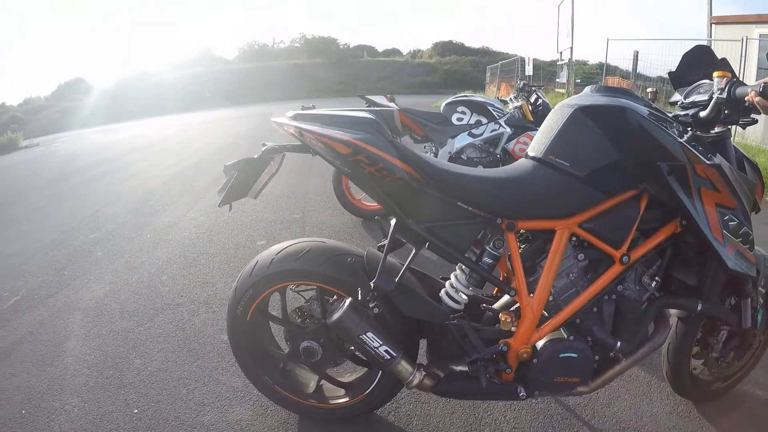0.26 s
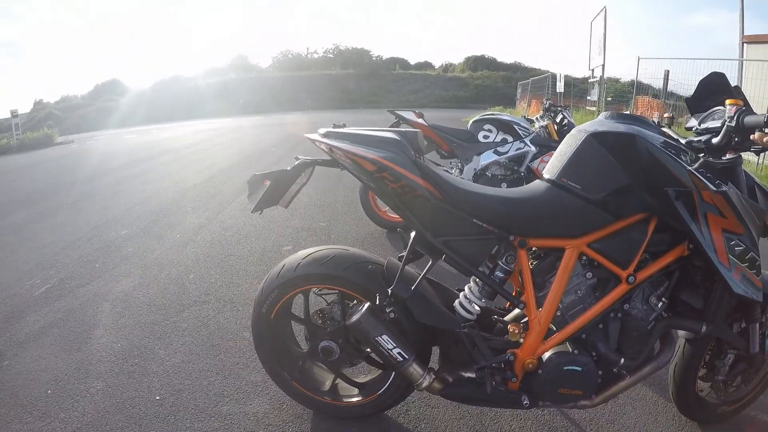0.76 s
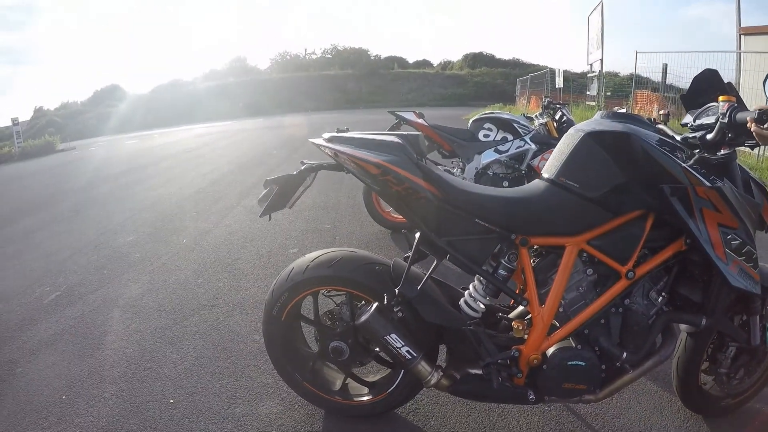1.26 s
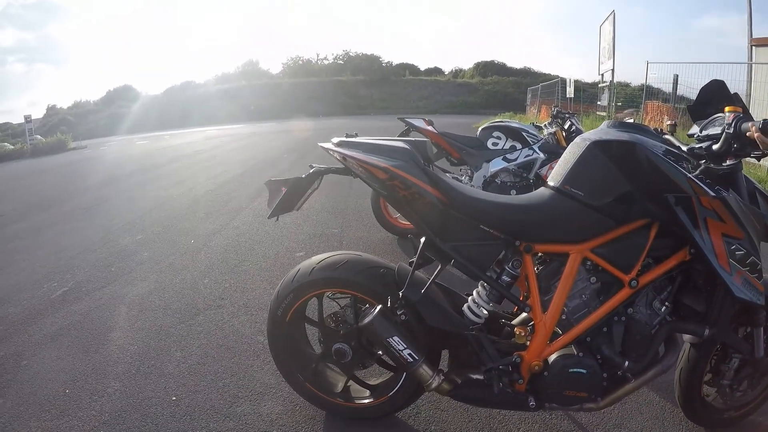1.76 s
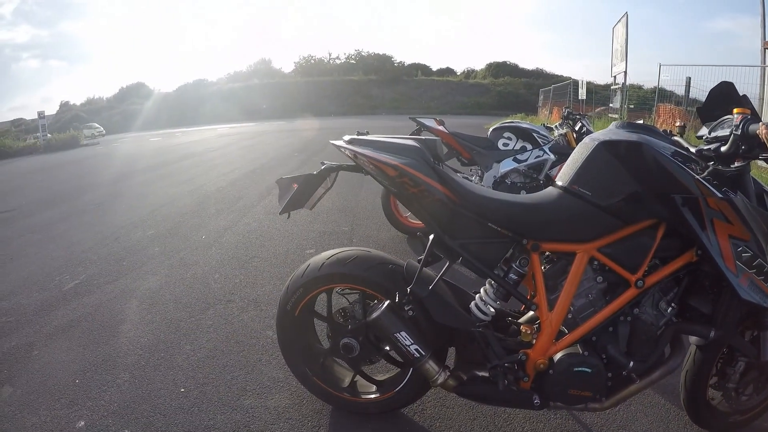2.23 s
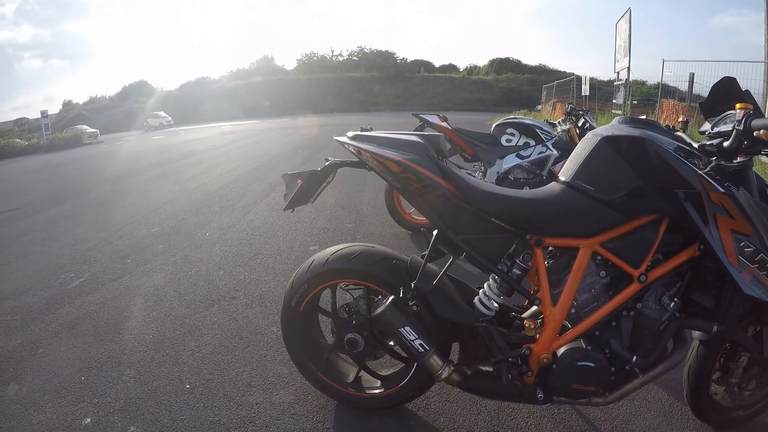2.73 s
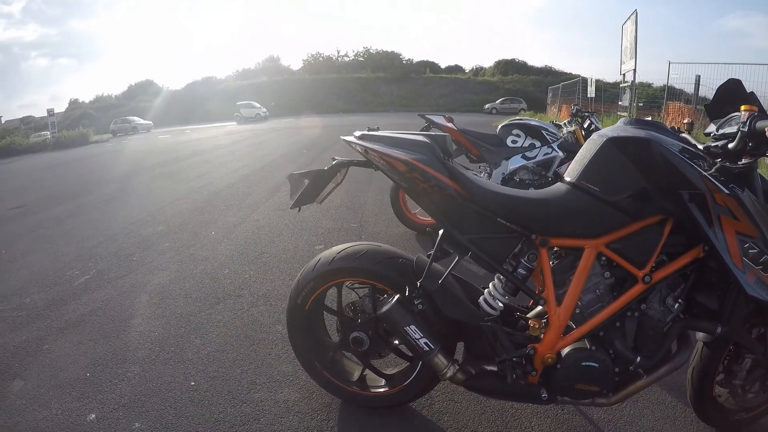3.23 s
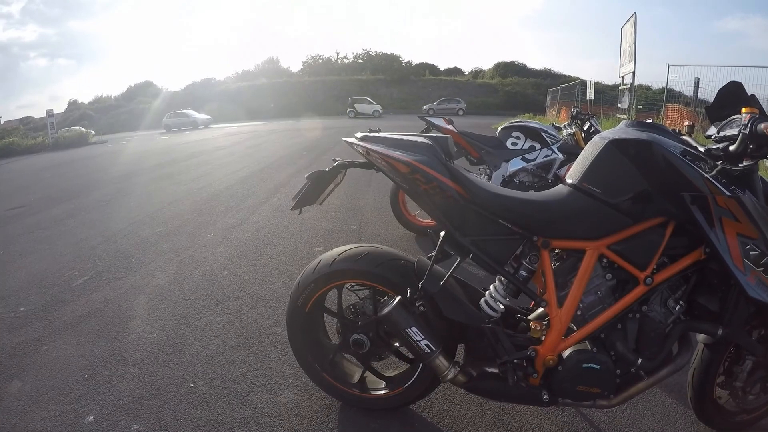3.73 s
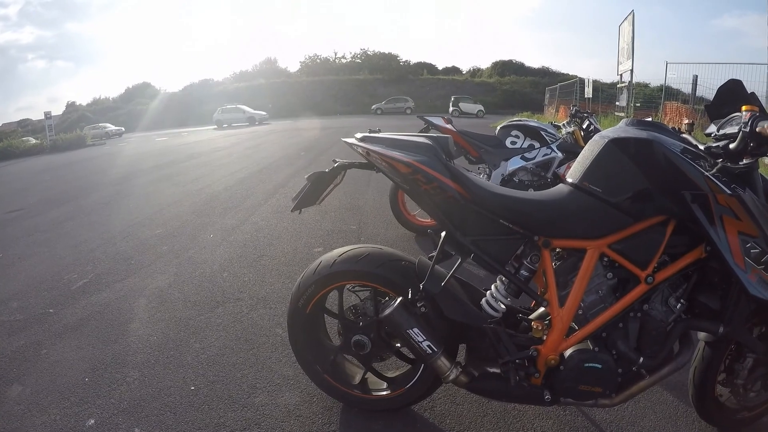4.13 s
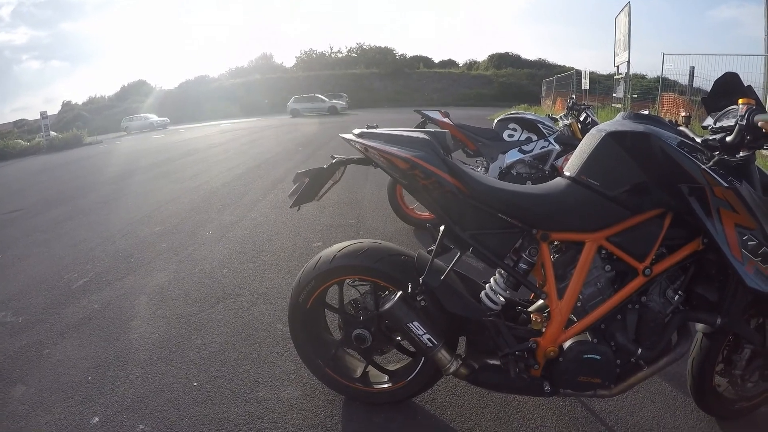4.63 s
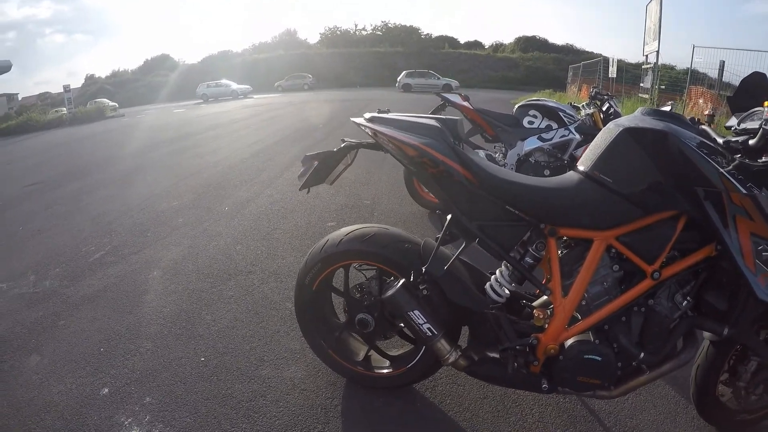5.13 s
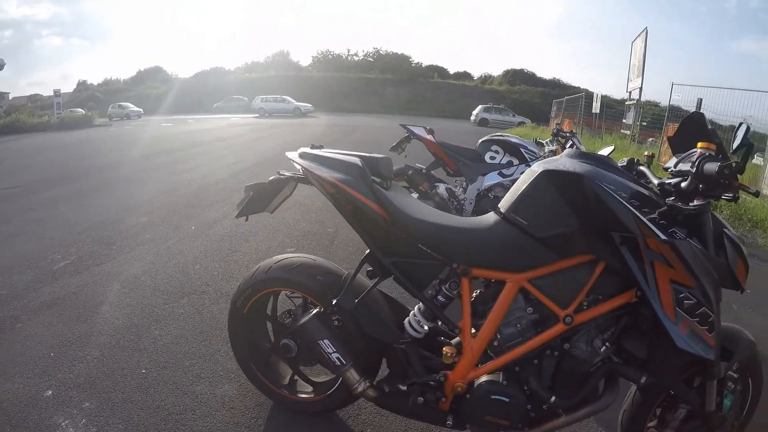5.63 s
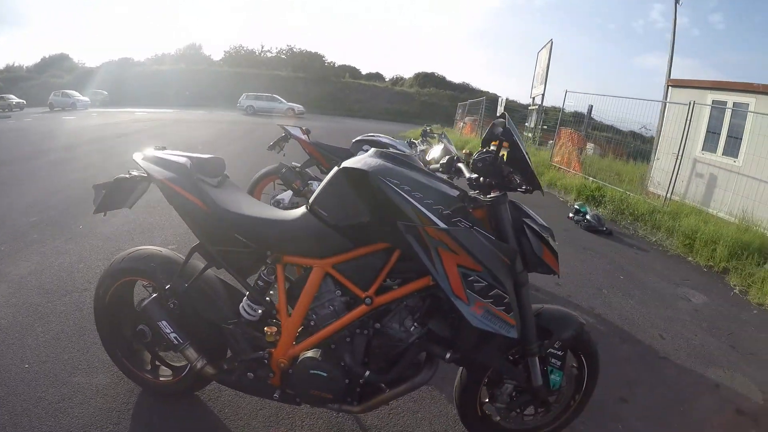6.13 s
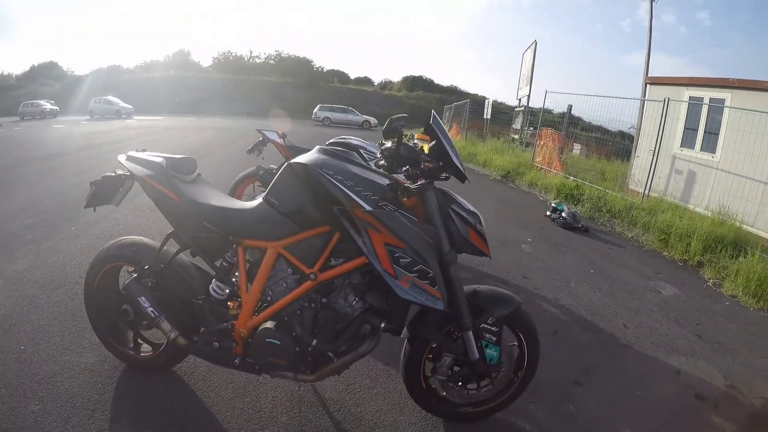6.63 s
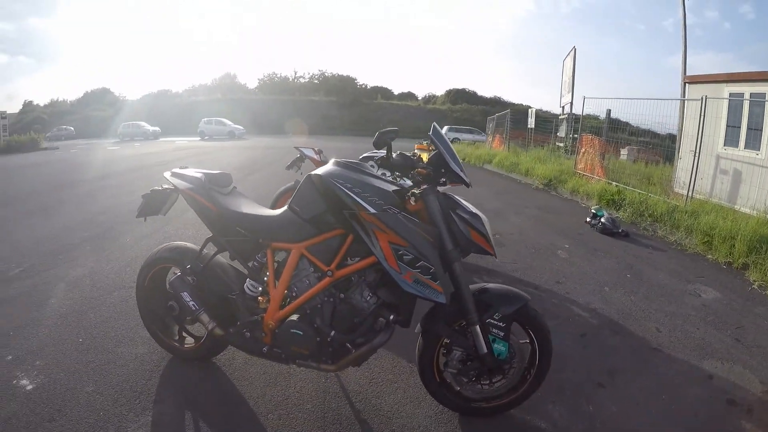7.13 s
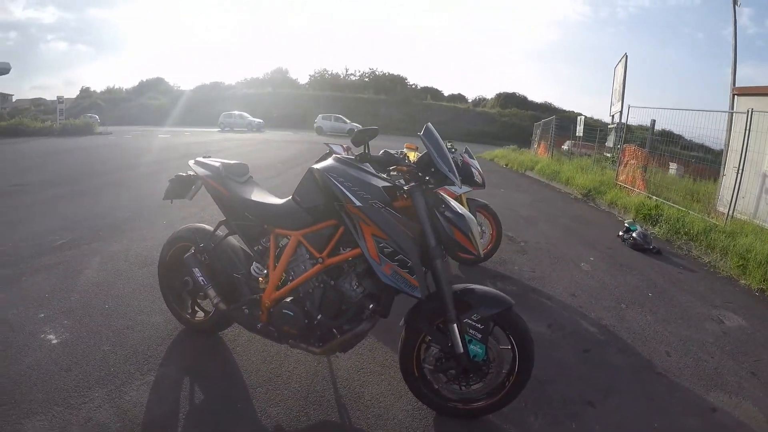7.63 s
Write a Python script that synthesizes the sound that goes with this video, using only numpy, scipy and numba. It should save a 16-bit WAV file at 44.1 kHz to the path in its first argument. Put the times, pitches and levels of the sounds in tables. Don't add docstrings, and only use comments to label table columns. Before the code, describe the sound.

A big twin-cylinder motorcycle idles with a lumpy thump, is revved in five sharp throttle blips, then settles to idle as the microphone gets bumped.

```python
import sys
import numpy as np
from scipy import signal
from scipy.fft import rfft, irfft
from scipy.io import wavfile
from scipy.ndimage import uniform_filter1d
from numba import njit

SR = 44100
rng = np.random.default_rng(int(sys.argv[2]) if len(sys.argv) > 2 else 0)


def volts(x):
    e = np.asarray(x, float) / 20
    return 10 ** e


def file_out(sig):
    cols = np.atleast_2d(sig).T
    lim = np.clip(cols, -1, 1)
    pcm = np.round(lim * 32767).astype(np.int16)
    wavfile.write(sys.argv[1], SR, pcm)


N = 347067

# start_s, thud_db, thud_hz, tick_db, tick_hz
HAND_BUMPS = [
    (6.312, -10.5, 40, -33, 900),
    (6.405, -13, 36.2, -42, 900),
    (6.616, -7.5, 25.8, -18.5, 800),
    (6.69, -23, 41, -27, 900),
    (6.78, -2.5, 43.5, -12.5, 1040),
    (7.121, -26, 59, -33, 1200),
    (7.431, -26, 65, -3.5, 2210),
]
# start_s, pitch_hz, level_db, t60_s
HOUSING_CREAK = (7.121, 1168, -25, .07)
# squeak_s, squeak_hz, squeak_db, squeak_length_s, rub_s, rub_hz, rub_db, rub_length_s
FINGER_SCUFF = (7.112, 2550, -29, .012, 7.13, 1250, -43, .07)

# centre_hz, width_hz, level_db
SILENCER_MODES = [(840, 36, -31), (1302, 145, -11.5), (1775, 134, 0.5), (1900, 100, 2), (2090, 113, 0)]
CASING_SIDE_MODES = [(2630, 184, 6.5), (3260, 450, -5.5), (3725, 42, 4.5), (4644, 80, 1.5),
                     (5610, 120, 0.5), (6880, 740, -10.5), (7900, 360, -35)]
CASING_FRONT_MODES = [(2630, 115, 4.5), (3400, 49, 3), (3700, 41, -14), (4730, 70, -11), (5600, 94, -7),
                      (6840, 160, -9), (8060, 210, -29)]
VALVE_COVER_MODES = [(3670, 190, 7.5), (4610, 280, 7), (2000, 230, -6), (7100, 770, -14), (9700, 250, -37)]
AIRBOX_MODES = [(57, 20, 4), (115, 50, -1)]
PIPE_IDLE_MODES = [(59, 16, 4.5), (90, 26, -4), (117, 22, 4)]
PIPE_OPEN_MODES = [(54, 65, 3), (119, 37, 5), (191.9, 62, -10), (310, 68, -2)]
PIPE_SHUT_MODES = [(52.2, 12, 9), (103.7, 40, 5), (119.3, 21.6, 1), (189, 51, -5.5), (302, 56, 9.5)]
PIPE_GROWL_MODES = [(356.4, 63, 4.5), (383, 44, -9), (433, 15.7, 3)]
# frequency_hz, level_db
RATTLE_SPECTRUM = [(280, -38), (480, -47), (740, -16.5), (1180, -4), (1400, -33), (1870, -12), (2350, -16),
                   (2640, -3), (3000, -0.5), (4700, -1), (5200, -3.5), (6940, -13), (15100, -40.5)]

# start_s, end_s
WALK_S = (6.4, 6.84)
# time_s, share_0_to_1
CAMERA_AWAY = [
    (.01, 0.38),
    (4.6, 0.34),
    (5.6, 0.38),
    (6.3, 0.6),
    (6.8, 0.77),
    (7.2, 1),
    (7.87, .99),
]

START_CYCLE = -.041
FIRE_CYCLE = (0, .604)
VALVE_CYCLE = (.2, .575)
BACKFLOW_CYCLE = (.2, .768)
# time_s, speed_cycles_per_s
IDLE_SPEED = [
    (0, 12.434),
    (.7, 10.997),
    (2.5, 12.725),
    (5, 12.193),
    (5.6, 11.724),
    (5.72, 12.984),
    (5.9, 11.664),
    (7.87, 11.696),
]
# open_s, spin_up_s, top_cycles_per_s, run_down_tau_s
THROTTLE_BLIPS = [
    (.6633, .1578, 34.55, .5289),
    (1.3526, .2077, 54.38, .4911),
    (2.5394, .1868, 37.46, .5279),
    (3.2326, .1603, 45.94, .4825),
    (3.8935, .1467, 44.54, .5216),
]
# hold_s, strength_0_to_1
GAS_AFTERFLOW = [
    (0.33, 0.44),
    (0.46, .99),
    (0.28, 0.55),
    (0.33, 0.8),
    (0.32, 0.78),
]
COAST_HZ = 6.169
OPENS_SHARE, SHUTS_SHARE = 0.075, 0.57
OPEN_S, SHUT_S, EBB_S = 0.035, 0.069, .08
# none_below_hz, full_above_hz of overrun
OVERRUN_HZ = (12.1, 17.4)

# idle_db, speed_db_per_octave, full_throttle_db, overrun_db, front_view_db, afterflow_db
THUMP_LEVEL = (-22, 4.5, 4, 0, -6, 3.5)
GROWL_LEVEL = (-17.5, 4.5, 6, -3, -8, 2)
HISS_LEVEL = (-31.5, 5.5, 6, -1.67, -8.5, 2.5)
CLATTER_LEVEL = (-35, 6, 5, -0.28, -0.6, 2.5)
CHOKE_HZ, CHOKE_DB_PER_OCTAVE = 32.4, -6


def unit(x):
    return x / np.sqrt(np.mean(x ** 2))


def even(x):
    return x / np.sqrt(uniform_filter1d(x ** 2, size=7000) + 1e-12)


def dull(x, top_hz):
    return signal.sosfilt(signal.butter(4, top_hz, fs=SR, output="sos"), x)


def thin(x, low_hz):
    return signal.sosfilt(signal.butter(2, low_hz, "high", fs=SR, output="sos"), x)


@njit
def svf(x, hz, width):
    y, b, l = np.empty(len(x)), 0., 0.
    g, k = np.tan(np.pi * hz / SR), width / hz
    for i in range(len(x)):
        v = (b + g * (x[i] - l)) / (1 + g * (g + k))
        b, l, y[i] = 2 * v - b, l + 2 * g * v, k * v
    return y


def ring(x, modes):
    return sum(volts(db) * svf(x + 1e-18, 1. * hz, 1. * width) for hz, width, db in modes)


def colour(x, spectrum):
    hz, db = np.transpose(spectrum)
    bins_hz = np.arange(1, N // 2 + 2) * SR / N
    return irfft(rfft(x) * volts(np.interp(np.log(bins_hz), np.log(hz), db)), N)


def strikes(cycle, place, scatter_db, early_s):
    count = np.floor(cycle - place).astype(int) + 2
    size = volts(scatter_db * rng.standard_normal(N // 1000))
    clicks = np.diff(count, prepend=count[0]) * size[count]
    return np.roll(clicks, -int(early_s * SR))


def push(x, seconds):
    return signal.fftconvolve(x, np.hanning(int(seconds * SR)))[:N]


def fade(x, seconds):
    return signal.lfilter([1], [1, -np.exp(-1 / (seconds * SR))], x)


def breeze():
    return volts(-32.0) * unit(ring(rng.standard_normal(N), [(32.7, 4.4, 0)]))


def scuff():
    t = np.arange(N) / SR
    squeak_s, squeak_hz, squeak_db, squeak_length_s, rub_s, rub_hz, rub_db, rub_length_s = FINGER_SCUFF
    squeak = unit(ring(rng.standard_normal(N), [(squeak_hz, 300, 0)]))
    squeak = np.exp(-((t - squeak_s) / squeak_length_s) ** 2) * squeak
    rub = ring(rng.standard_normal(N), [(rub_hz, 500, 0)])
    rub = unit(ring(rub, [(rub_hz, 600, 0)]))
    rub = (t > rub_s) * (t < rub_s + rub_length_s) * rub
    return volts(squeak_db) * squeak + volts(rub_db) * rub


def hand():
    out, t = np.zeros(N), np.arange(N) / SR
    for start_s, thud_db, thud_hz, tick_db, tick_hz in HAND_BUMPS:
        age = np.clip(t - start_s, 0, None)
        out += volts(thud_db) * np.sin(2 * np.pi * thud_hz * age ** 0.786 / 2) * np.exp(-age / 0.022)
        out += volts(tick_db) * np.sin(2 * np.pi * tick_hz * age) * np.exp(-age / .0007)
    start_s, hz, db, t60_s = HOUSING_CREAK
    age = np.clip(t - start_s, 0, None)
    return out + volts(db) * np.sin(2 * np.pi * hz * age) * volts(-60 * age / t60_s)


def crank(t):
    hz = idle = np.interp(t, *np.transpose(IDLE_SPEED))
    for open_s, spin_s, top_hz, sink_s in THROTTLE_BLIPS:
        start_hz, age = np.interp(open_s, t, hz), t - open_s
        rise = start_hz + (top_hz - start_hz) * np.sin(np.pi / 2 * age / spin_s) ** 2
        fall = COAST_HZ + (top_hz - COAST_HZ) * np.exp((spin_s - age) / sink_s)
        fall = np.maximum(fall, idle)
        hz = np.where(age < 0, hz, np.where(age < spin_s, rise, fall))
    return hz


def throttle(t):
    load, flow = 0, 0
    for (open_s, spin_s, _, _), (hold_s, strength) in zip(THROTTLE_BLIPS, GAS_AFTERFLOW):
        age = t - open_s
        rise = np.clip((age - OPENS_SHARE * spin_s) / OPEN_S, 0, 1)
        load = load + rise * np.clip(1 - (age - SHUTS_SHARE * spin_s) / SHUT_S, 0, 1)
        flow = flow + strength * rise * np.clip(1 - (age - hold_s) / EBB_S, 0, 1)
    return load, flow


def gear_whine(cycle):
    mesh = np.sin(2 * np.pi * 158 * cycle + .6 * np.sin(4 * np.pi * cycle))
    mesh = mesh * volts(2.5 * unit(dull(rng.standard_normal(N), 14)))
    body = [(3900, 3000, 0)]
    return volts(-8) * ring(ring(mesh, body), body)


def clatter(cycle, hz, hiss_db, clatter_db):
    first, second = (strikes(cycle, p, scatter_db=.8, early_s=.002) for p in VALVE_CYCLE)
    ticks = (first + volts(-3) * second) * (12 / hz) ** .7
    puff = 0.46 + 1.52 * fade(np.roll(ticks, 90), seconds=0.0018)
    hiss = ring(even(puff) * rng.standard_normal(N), SILENCER_MODES)
    hiss = unit(thin(dull(hiss, 2500), 1220))

    small = (rng.random(N) < 9 * hz / SR) * volts(4 * rng.standard_normal(N))
    shake = .5 + .5 * fade(ticks, seconds=.004) + .6 * fade(ticks, seconds=.018)
    shake = shake + .2 * fade(small, seconds=.003)
    rattle = even(shake) * rng.standard_normal(N)
    front_view = np.interp(np.arange(N) / SR, WALK_S, (0, 1))
    side = (1 - front_view) * unit(ring(rattle, CASING_SIDE_MODES))
    modes = side + front_view * unit(ring(rattle, CASING_FRONT_MODES))
    tick = fade(ticks, seconds=.0025) * rng.standard_normal(N) + 11 * ticks
    tick = unit(ring(tick, VALVE_COVER_MODES))
    casing = thin(modes + volts(-5) * tick, 1500) + volts(1) * unit(colour(rattle, RATTLE_SPECTRUM))
    top_db = -33.0 + 7.9 * np.log2(np.minimum(hz, 36.) / 12)
    top = volts(top_db) * unit(ring(rattle, [(9780, 150, 6), (7760, 540, -9.0)]))
    return volts(hiss_db) * hiss + volts(clatter_db) * (unit(casing) + top + gear_whine(cycle))


def exhaust(cycle, hz, load, overrun, growl_db):
    front, rear = (strikes(cycle, p, scatter_db=1.2, early_s=0.0083) for p in FIRE_CYCLE)
    front[0] = -1
    fast = np.clip((hz - 14) / 14, 0, 1)
    overrun = np.maximum(overrun, fast * (1 - load))
    idle = (1 - load) * (1 - overrun)
    lazy = ring(push((front + volts(-7.5) * rear) * idle, seconds=.006), PIPE_IDLE_MODES)
    blows = np.roll(front + rear, 60) * load
    hard = dull(ring(push(blows, seconds=0.0015), PIPE_OPEN_MODES), 470)
    first, second = (strikes(cycle, p, scatter_db=1.5, early_s=.006) for p in VALVE_CYCLE)
    valves = (first + volts(-7) * second) * (1 - load) * (1 - overrun * fast)
    suck = ring(push(-valves, seconds=.008), AIRBOX_MODES)
    back = sum(strikes(cycle, p, scatter_db=1.1, early_s=.006) for p in BACKFLOW_CYCLE)
    back = back * overrun * fast
    shut = ring(push(-back, seconds=.0065), PIPE_SHUT_MODES)
    thump = volts(1.5) * lazy + volts(8) * hard + (volts(-1.5) + 0.15 * overrun) * suck + volts(-3) * shut
    thump = thump / np.sqrt(hz)

    edges = front * idle + volts(1.0) * blows - volts(0.0 + 4.4 * overrun) * valves - volts(2) * back
    edges = edges / np.sqrt(hz)
    gas = fade(np.abs(edges), seconds=0.01) * rng.standard_normal(N)
    growl = unit(ring(edges, PIPE_GROWL_MODES)) + volts(-8) * unit(ring(gas, PIPE_GROWL_MODES))
    growl = unit(dull(ring(growl, [(335, 144, 0)]), 456))
    rasp = ring(unit(edges) + volts(-1) * unit(gas), [(840, 170, 0), (622, 120, -4)])
    rasp = unit(ring(rasp, [(800, 470, 0)]))
    rasp_gain = volts(-18.5) * (hz / 12) ** 0.73
    return unit(thump) + volts(growl_db) * (growl + rasp_gain * rasp)


def scene():
    t = np.arange(N) / SR
    hz = crank(t)
    cycle = START_CYCLE + np.cumsum(hz) / SR
    load, flow = throttle(t)
    overrun = (1 - load) * np.interp(hz, OVERRUN_HZ, (0, 1))
    octaves = np.log2(hz / 12)
    away = np.interp(t, *np.transpose(CAMERA_AWAY))
    state = np.array([np.ones(N), octaves, load, overrun, away, flow])
    laws = np.array([THUMP_LEVEL, GROWL_LEVEL, HISS_LEVEL, CLATTER_LEVEL])
    thump_db, growl_db, hiss_db, clatter_db = laws @ state
    choke_octaves = np.log2(np.maximum(hz / CHOKE_HZ, 1))
    thump_db = thump_db + CHOKE_DB_PER_OCTAVE * (1 - load) * choke_octaves
    engine = clatter(cycle, hz, hiss_db, clatter_db)
    pipe = volts(thump_db) * exhaust(cycle, hz, load, overrun, growl_db)
    return (breeze() + scuff() + hand() + engine + pipe)[None]


def top_cut(x):
    return signal.sosfilt(signal.butter(12, 15290, fs=SR, output="sos"), x)


def record(dry):
    trimmed = signal.sosfilt(signal.butter(1, 14, "high", fs=SR, output="sos"), dry)
    trimmed = signal.sosfilt(signal.ellip(8, .2, 50, 15300, fs=SR, output="sos"), trimmed)
    rounded = .95 * np.tanh(trimmed / .95)
    return top_cut(rounded)


dry = scene()
out = record(dry)
file_out(out)
```